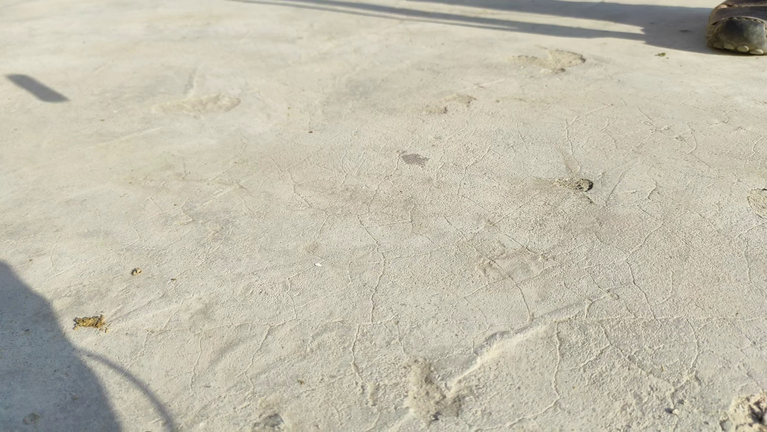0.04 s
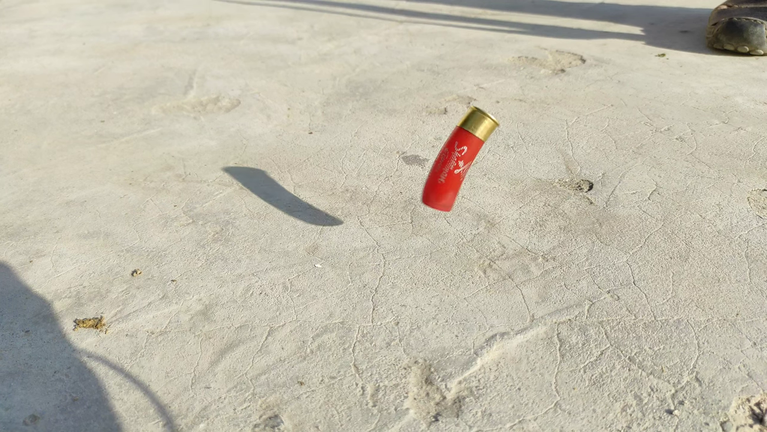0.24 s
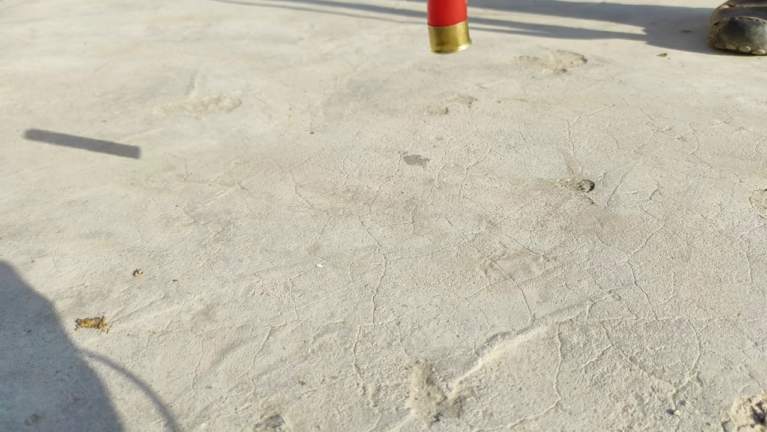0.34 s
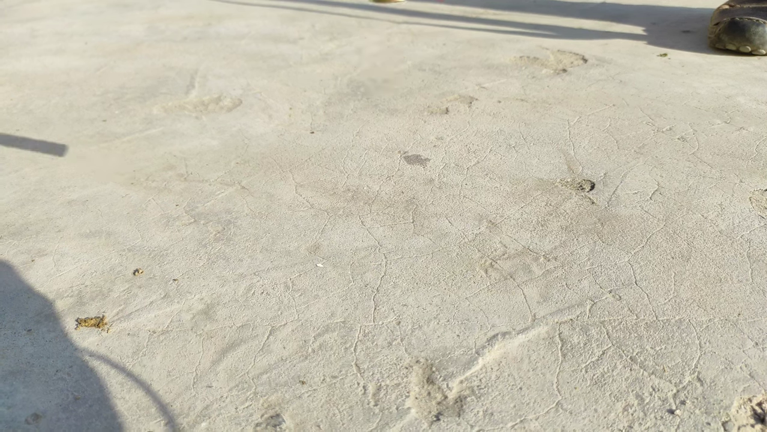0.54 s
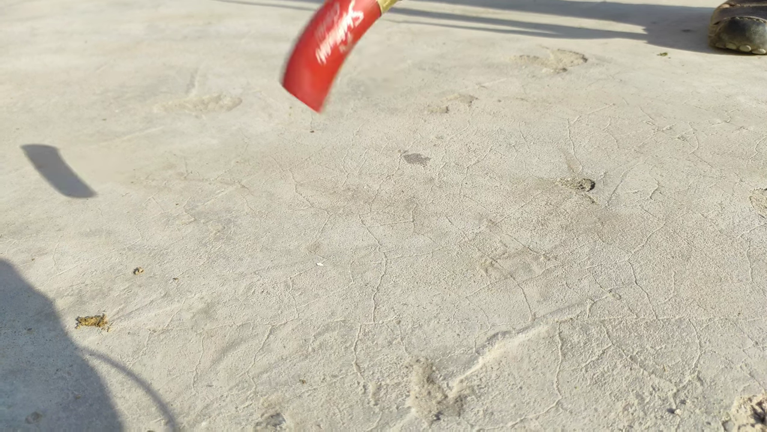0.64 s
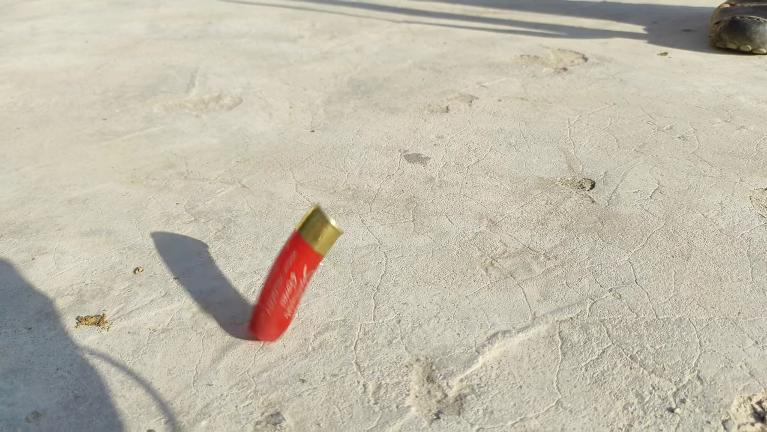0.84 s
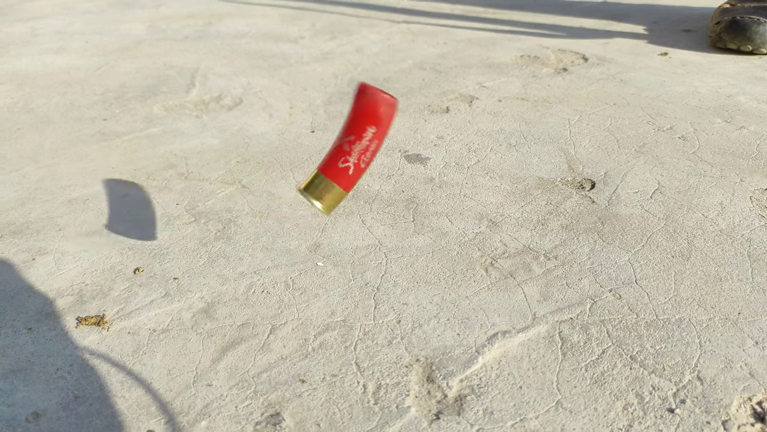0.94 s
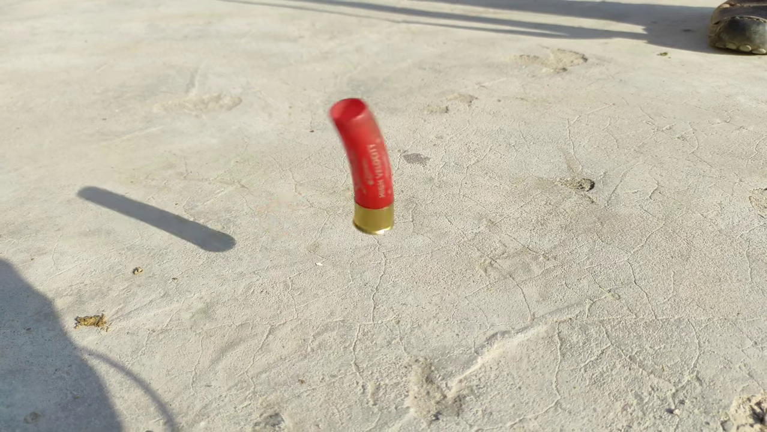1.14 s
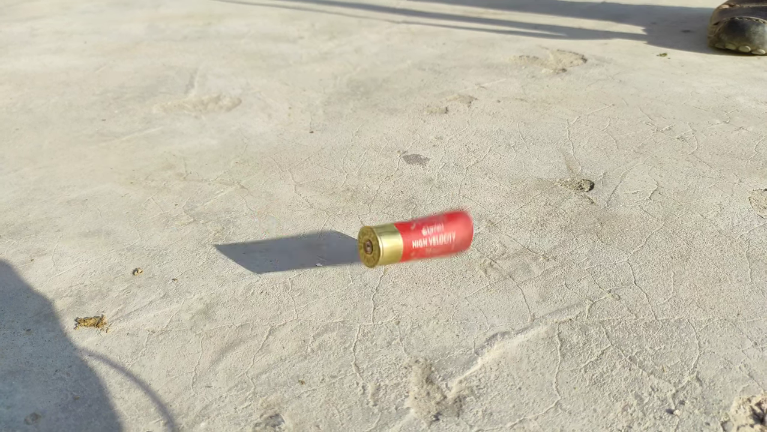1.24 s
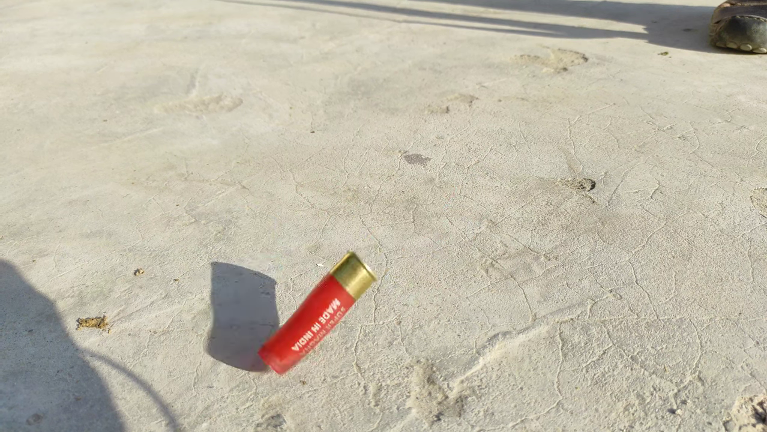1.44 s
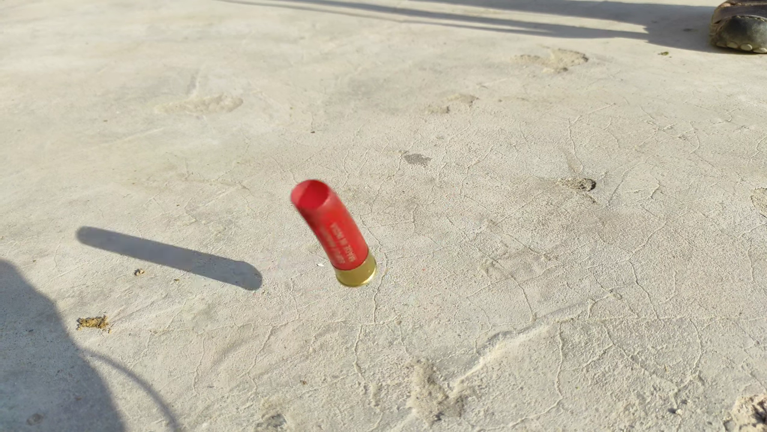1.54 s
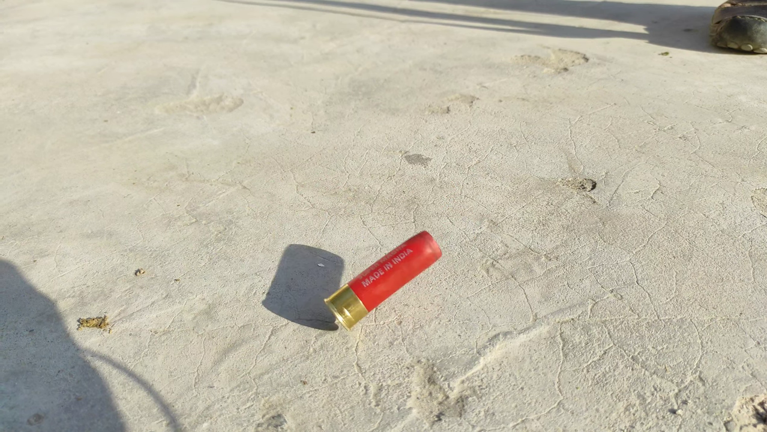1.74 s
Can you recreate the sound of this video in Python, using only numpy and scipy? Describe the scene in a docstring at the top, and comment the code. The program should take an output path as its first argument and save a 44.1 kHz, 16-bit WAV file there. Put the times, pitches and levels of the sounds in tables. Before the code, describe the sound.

Close by, a spent shotgun shell hits concrete and tumbles, making four quick double clacks of hollow plastic and brass that come closer and closer together. A soft outdoor echo follows each, while an engine hums faintly far away.

```python
"""A sharp clack: an empty shotgun shell lands on concrete close by and tumbles, touching down four times.
Each time, one end hits just after the other. Every hit rings the brass head, the plastic tube and the
air inside it, over a short thud. The first landing also puffs air at the left microphone.
The yard answers with a soft wash of echo and a few faint slaps, while a distant engine hums."""
import sys
import numpy as np
from scipy import signal
from scipy.fft import rfft, irfft
from scipy.io import wavfile

SR = 44100
rng = np.random.default_rng(int(sys.argv[2]) if len(sys.argv) > 2 else 0)


def to_wav(sig):
    """Store sig (one row per channel, or 1-D mono) as 16-bit WAV at the path in sys.argv[1].

    Samples outside -1..1 are clipped; the rate is SR.
    """
    pcm = np.clip(np.atleast_2d(sig), -1, 1) * 32767
    pcm = np.round(pcm).astype(np.int16)
    wavfile.write(sys.argv[1], SR, pcm.T)  # frames by channels


N = 79380  # 1.8 seconds
SHARP_RISE_S, SOFT_RISE_S = 0.00026, 0.0015

# Each hit on the concrete and how strongly it sounds each part. A positive pan_db leans left.
# start_s, air_db, plastic_db, head_db, rim_db, pop_db, thud_db, crack_db, yard_db, pan_db
HITS = [(0.2211, -8, -19, -4.5, -34, -28, -25, -10.5, 9.5, 0),
        (0.2246, 6.5, -5.5, 5.5, -4, -14, -4, -6, 1.5, -1.5),
        (0.2426, 2.5, -14, -7.5, -1.5, -1.5, -12.5, -4.5, 7, -2),
        (0.9266, -19.5, 1, -10, -1.5, -26, -4.5, -6.5, -7, 1),
        (0.9472, -9.5, 0, -3.5, -2, -18, -4.5, -10, -1.5, 2.5),
        (1.3363, -9.5, -0.5, -20, -1, 1, 5.5, -7.5, -6, 0),
        (1.3597, -10.5, -4.5, -7, -4, -0.5, 4, -6.5, -2.5, 0),
        (1.5310, -49, -5.5, -9.5, -6.5, -3, -11.5, -10, -3.5, -3.5),
        (1.5420, -15, -10, -11.5, -14.5, -5, -15, -12.5, -1.5, 0.5)]
def bouncing_shell():
    """The shell hits the ground: returns the sound heard directly and the sound sent into the yard."""
    direct, sent = np.zeros((2, N)), np.zeros((2, N))
    for start_s, air_db, plastic_db, head_db, rim_db, pop_db, thud_db, crack_db, yard_db, pan_db in HITS:
        hit = clack(air_db, plastic_db, head_db, crack_db)
        hit += undb(rim_db) * brass_rim()
        hit += pop_and_thud(pop_db, thud_db)
        add(direct, start_s, hit * pan(pan_db))
        add(sent, start_s, hit * undb(yard_db))
    return direct, sent


# The tones of the air in the tube, the plastic wall and the brass head.
# pitch_hz, level_db, fade_s, pan_db, delay_s
AIR_TONES = [(1313, -5.5, 0.022, -11, 0.000483), (1292, -14.5, 0.017, 19.5, 0.000713)]
PLASTIC_TONES = [(1590, -11, 0.0037, 10.5, .0002), (1853, -5, 0.0071, -10.5, 0.00027),
                 (2288, -7.5, 0.0087, -17, 0.00014), (2490, -23.5, 0.009, -22.5, 0.00024),
                 (3609, -25, 0.035, -16.5, .0003), (4022, -19.5, 0.022, 7, 0.000084),
                 (5060, -14.5, 0.0044, 23.5, 0.00014)]
HEAD_TONES = [(5751, -13, 0.014, 11, 0.00085), (6830, -13.5, 0.011, 1, 0.0012),
              (8147, -6.5, 0.012, 10.5, 0.00011), (8216, -6.5, 0.0089, 2.5, 0.000087)]
def clack(air_db, plastic_db, head_db, crack_db):
    """Air, plastic and brass ring together with a crack. So small a shell gives off little bass."""
    air = undb(air_db) * cut_bass(ring(AIR_TONES), hz=900)
    plastic = undb(plastic_db) * cut_bass(ring(PLASTIC_TONES), hz=1450)
    head = undb(head_db) * ring(HEAD_TONES)
    return air + plastic + head + undb(crack_db) * crack()


# The tones of the brass rim: pitch_hz, level_db, fade_s, pan_db, delay_s
RIM_TONES = [(6010, -22.5, 0.02, 22, .0001), (7470, -9.5, 0.0081, -15.5, 0.00011),
             (8770, -6.5, 0.011, 19.5, 0.00068), (9070, -11.5, 0.0066, -25, 0.0018)]
def brass_rim():
    """The struck rim rings with a short, bright tick."""
    return ring(RIM_TONES)


# How strong the crack is from low to high: pitch_hz, level_db
CRACK_COLOUR = [(200, -49.5), (1000, -6), (1900, -8), (3200, -5.5), (4600, -9), (6000, -13.5), (7600, -3.5),
                (8900, 1), (10200, -11.5), (13000, -21.5), (16000, -29)]
def crack(level_db=-7, side_db=-4.5, hold_s=0.0014, fade_s=0.012):
    """Grit crushed under the shell makes a tiny burst of noise, much alike on both sides."""
    t = hit_time()
    shared, *sides = noise(CRACK_COLOUR, channels=3)[:, :t.shape[1]]
    centre = np.interp(t, t[1], shared)  # the same noise, a little later on the left
    grit = centre + undb(side_db) * np.array(sides)
    return undb(level_db) * grit * swell(t, SHARP_RISE_S) * fade(t - hold_s, fade_s)


# The low tones of the hollow tube and of the thud: pitch_hz, level_db, fade_s, pan_db, delay_s
POP_TONES = [(842.4, -13, 0.021, 1, 0.0013), (913, -23.5, 0.018, -1, 0.0013)]
THUD_TONES = [(475.6, 0, 0.0098, 4, 0.0011), (285, -2.5, 0.013, 4.9, .0016)]
def pop_and_thud(pop_db, thud_db):
    """The slower, lower part of a hit: the tube's hollow pop and a thud without deep bass."""
    pop = undb(pop_db) * ring(POP_TONES, SOFT_RISE_S)
    thud = undb(thud_db) * ring(THUD_TONES, SOFT_RISE_S)
    return cut_bass(pop + thud, hz=328)


# The note that lingers after the first and last landing: start_s, level_db, fade_s
LINGERING_NOTES = [(0.2258, -25.5, 0.49), (1.529, -34.5, 0.24)]
def singing_tube(pitch_hz=1347, pan_db=3):
    """A clean hit on the shell's end leaves the air inside singing faintly."""
    out = 0
    for start_s, level_db, fade_s in LINGERING_NOTES:
        t = np.arange(N) / SR - start_s
        loudness = undb(level_db) * swell(t, SOFT_RISE_S) * fade(t, fade_s)
        out += loudness * np.sin(2 * np.pi * pitch_hz * t)
    return out * pan(pan_db)


# Puffs from the tube's mouth: start_s, level_db
AIR_PUFFS = [(0.2283, -18), (0.247, -19)]
# The rumble of swirling air in a puff: pitch_hz, level_db
SWIRL_COLOUR = [(15, 6), (55, 7), (90, -40), (150, -4.5), (280, -4), (400, -14), (550, -31), (900, -41)]
def air_puffs(rise_s=0.0011, swirl_fall_s=0.02, push_fall_s=0.15, right_db=-16.5):
    """Air thrown by the first landing pushes mostly on the left microphone, with a brief flutter."""
    out = 0
    for start_s, level_db in AIR_PUFFS:
        age = np.maximum(np.arange(N) / SR - start_s, 0)
        swirl = noise(SWIRL_COLOUR, channels=1)[0] * np.exp(-age / swirl_fall_s)
        push = np.exp(-age / push_fall_s)
        out += undb(level_db) * swell(age, rise_s) * (swirl - push)
    return cut_bass(out, hz=1.3, order=2) * undb([[0], [right_db]])


# Single echoes off things in the yard: start_s, air_db, plastic_db, head_db, pan_db
SLAP_ECHOES = [(0.2589, -36, -43, -38, -1), (0.2794, -21, -50, -45, -7), (0.2853, -12.5, -35, -48, -4.5),
               (.2998, -12.5, -42, -21, -0.5), (0.322, -45, -53, -17, 0), (0.3463, -56, -55, -14, 0),
               (0.363, -32.5, -41, -11, 2), (1.0345, -33, -33, -27, 5.5), (1.0552, -65, -46, -21, -1),
               (1.078, -30, -47, -27, 7.5), (1.4447, -73, -38, -31.5, 10.5),
               (1.4686, -41, -30, -30.5, 13.5), (1.5030, -52, -29, -19.5, -7)]
def slap_echoes(top_hz=8800):
    """Faint clacks come back, dulled by the distance."""
    out = np.zeros((2, N))
    for start_s, air_db, plastic_db, head_db, pan_db in SLAP_ECHOES:
        echo = clack(air_db, plastic_db, head_db, crack_db=head_db - 9)
        add(out, start_s, echo * pan(pan_db))
    return signal.sosfilt(signal.butter(4, top_hz, fs=SR, output="sos"), out)


# How strong the wash of echo is from low to high: pitch_hz, level_db
YARD_COLOUR = [(150, -11), (380, 7.5), (800, -2), (1330, -0.5), (2200, -2), (3200, 1.5), (4300, -4.5),
               (5400, 7.5), (5850, 5.5), (6500, 5.5), (8600, -6.5), (10500, -9), (15000, 2.5)]
# Far walls that briefly swell the wash: delay_s, spread_s, level_db (relative to the wash)
WALL_ECHOES = [(0.129, 0.01, -27), (0.302, 0.04, -19)]
def yard_echo(sent, level_db=-14.5, pan_db=1.5, low_fade_s=1.126, treble_fade_s=1, split_hz=5000):
    """Many small, uneven echoes blur into a grainy wash whose treble dies a little sooner."""
    t = np.arange(N) / SR
    walls = sum(undb(db) * np.exp(-((t - delay_s) / spread_s) ** 2)
                for delay_s, spread_s, db in WALL_ECHOES)
    grain_db, grain_hz = 2.5, 218
    grain = undb(grain_db * noise([(grain_hz, 0), (2 * grain_hz, -60)], channels=1)[0])
    shape = swell(t, rise_s=0.0023) * (1 + walls) * grain
    low_filter = signal.butter(2, split_hz, fs=SR, output="sos")
    out = 0
    for side in sent:
        scatter = noise(YARD_COLOUR)
        low = signal.sosfiltfilt(low_filter, scatter)
        treble = scatter - low
        tail = (low * fade(t, low_fade_s) + treble * fade(t, treble_fade_s)) * shape
        tail /= np.sqrt(np.sum(tail ** 2))
        out += signal.fftconvolve(side[None], tail, axes=1)[:, :N]  # give every hit this tail
    return undb(level_db) * pan(pan_db) * out


# The tones of the engine: pitch_hz, level_db
ENGINE_TONES = [(84.5, -52), (170, -63), (253, -70)]
def engine_hum(wander_hz=4, wander_depth=0.015, pan_db=6.5):
    """A distant engine hums, its pitch wavering slightly."""
    drift = noise([(wander_hz, 0), (10 * wander_hz, -80)], channels=1)[0]
    phase_per_hz = 2 * np.pi * np.cumsum(1 + wander_depth * drift) / SR
    hum = sum(np.sqrt(2) * undb(level_db) * np.sin(pitch_hz * phase_per_hz + rng.uniform(0, 2 * np.pi))
              for pitch_hz, level_db in ENGINE_TONES)
    return hum * pan(pan_db)


# How strong the outdoor air is from low to high: pitch_hz, level_db
OUTDOOR_COLOUR = [(25, -7.5), (50, -5.5), (110, -6.5), (230, -2), (340, -16), (500, -17.5), (900, -22.5),
                  (1300, -25), (2400, -26), (6000, -33.5), (7600, -21), (9000, -28.5), (10200, -77),
                  (15000, -55)]
# Which way it leans: pitch_hz, pan_db
OUTDOOR_PAN = [(60, -14), (330, 5), (1000, 2.5), (9000, 2.5)]
def outdoor_air(level_db=-58.5, side_db=4.5):
    """The open air makes a faint, steady rush, with its deepest rumble on the right."""
    rush = noise(OUTDOOR_COLOUR, channels=1) + undb(side_db) * noise(OUTDOOR_COLOUR)
    lean = undb(np.array([[1], [-1]]) * curve(OUTDOOR_PAN) / 2)
    return undb(level_db) * irfft(rfft(rush) * lean, N)


def ring(tones, rise_s=SHARP_RISE_S, detune=0.006):
    """A struck part rings with a few fading tones, tuned a little differently on every hit."""
    out = 0
    for pitch_hz, level_db, fade_s, pan_db, delay_s in tones:
        t = hit_time() - delay_s
        hz = pitch_hz * (1 + detune * rng.standard_normal())
        loudness = undb(level_db) * pan(pan_db) * swell(t, rise_s) * fade(t, fade_s)
        out += loudness * np.sin(2 * np.pi * hz * t)
    return out


def hit_time(left_lag_s=0.00016):
    """Seconds since a hit, for left and right: the left hears it slightly later."""
    return np.arange(SR // 10) / SR - np.array([[left_lag_s], [0]])


def undb(db):
    """Turn decibels into a multiplier."""
    return 10 ** (np.asarray(db) / 20)


def pan(db):
    """Left and right multipliers that make the left louder by db."""
    return undb(np.array([[db], [-db]]) / 2)


def curve(points):
    """Join (pitch_hz, value) points to get a value at every frequency."""
    hz, value = np.array(points, float).T
    all_hz = np.maximum(np.fft.rfftfreq(N, 1 / SR), 1)
    return np.interp(np.log(all_hz), np.log(hz), value)


def noise(colour, channels=2):
    """Separate noises of the given colour, scaled to a typical size of 1."""
    x = irfft(rfft(rng.standard_normal((channels, N))) * undb(curve(colour)), N)
    return x / x.std()


def fade(t, fade_s):
    """Die away from t = 0, dropping 60 dB in fade_s."""
    return np.exp(-np.log(1000) * np.maximum(t, 0) / fade_s)


def swell(t, rise_s):
    """Rise smoothly from silence at t = 0."""
    return 1 - np.exp(-(np.maximum(t, 0) / rise_s) ** 2)


def cut_bass(x, hz, order=3):
    """Turn down everything below hz."""
    return signal.sosfilt(signal.butter(order, hz, "high", fs=SR, output="sos"), x)


def add(out, start_s, x):
    """Mix a short sound in at a given time."""
    i = int(round(start_s * SR))
    out[:, i:i + x.shape[1]] += x[:, :N - i]


def scene():
    """The bouncing shell in its yard."""
    direct, sent = bouncing_shell()
    shell_and_echoes = direct + singing_tube() + slap_echoes() + yard_echo(sent)
    return shell_and_echoes + air_puffs() + engine_hum() + outdoor_air()


def record(dry, clip_hardness=2.9, top_hz=15800):
    """The loudest clacks overload the recorder, which rounds their peaks; the highest treble is cut."""
    clipped = dry / (1 + np.abs(dry) ** clip_hardness) ** (1 / clip_hardness)
    return signal.sosfilt(signal.ellip(8, .2, 70, top_hz, fs=SR, output="sos"), clipped)


dry = scene()
out = record(dry)
to_wav(out)
```